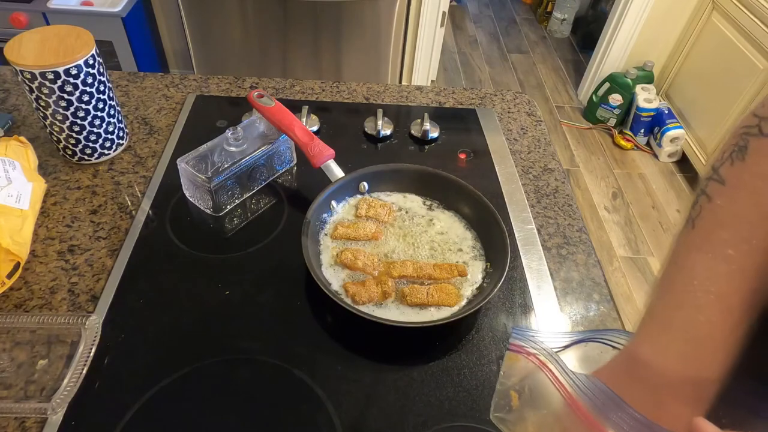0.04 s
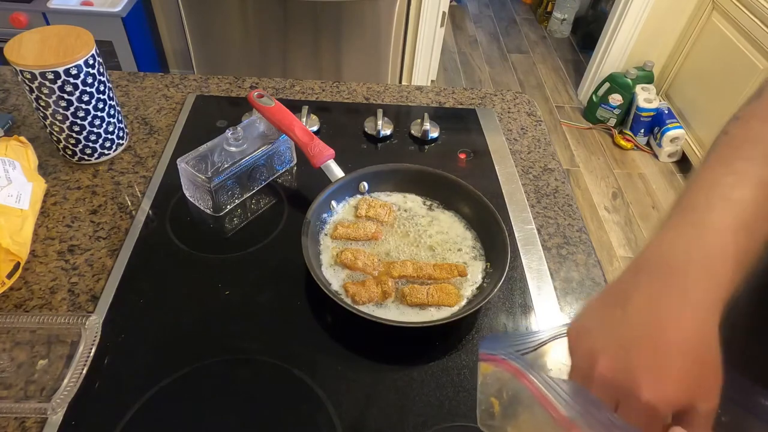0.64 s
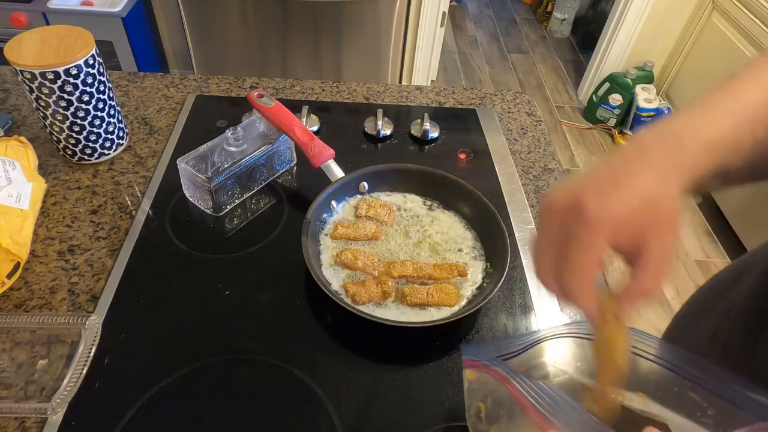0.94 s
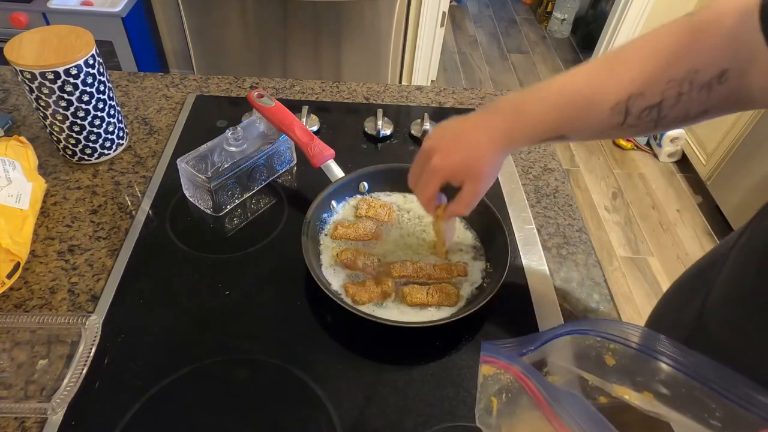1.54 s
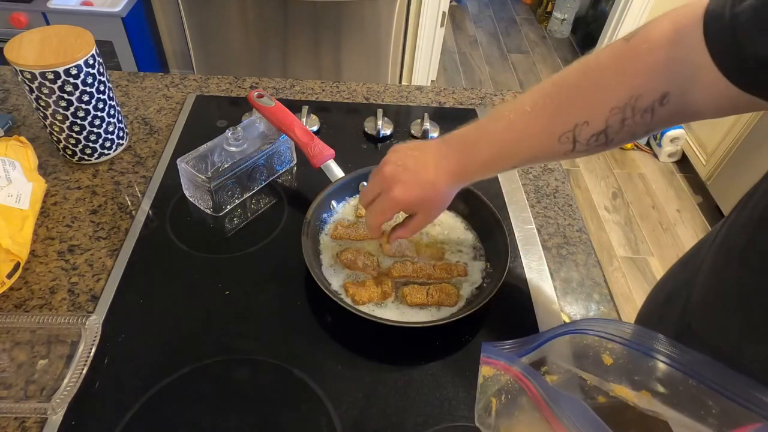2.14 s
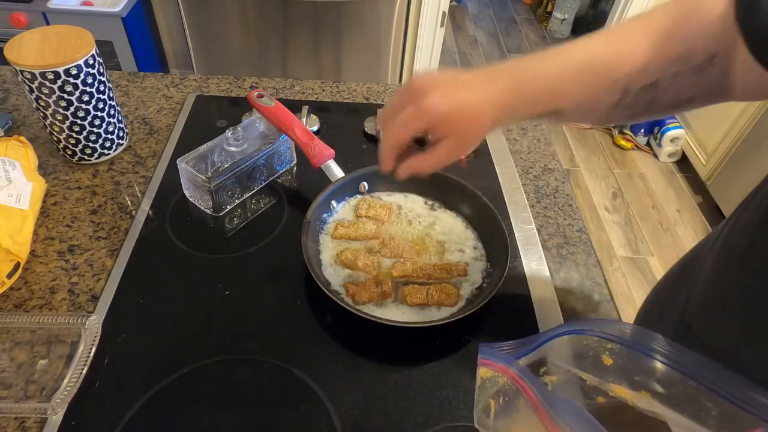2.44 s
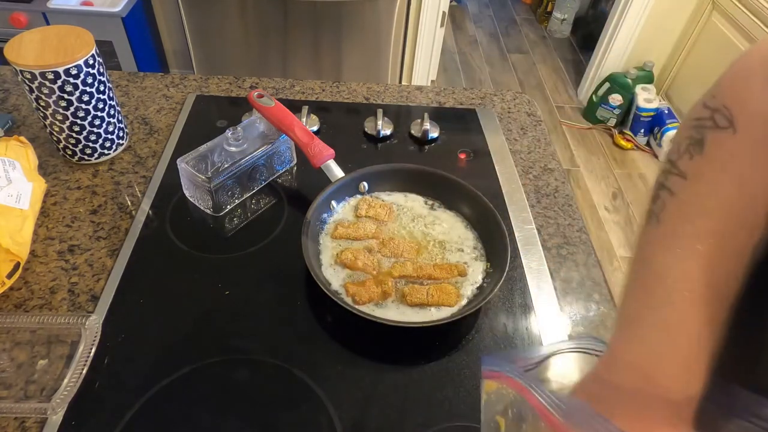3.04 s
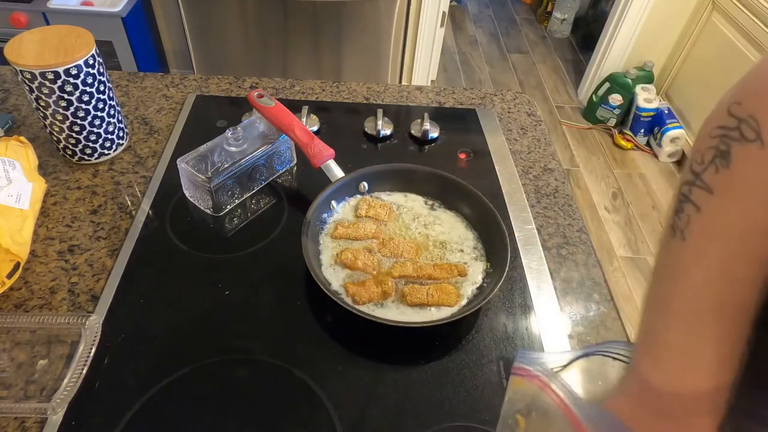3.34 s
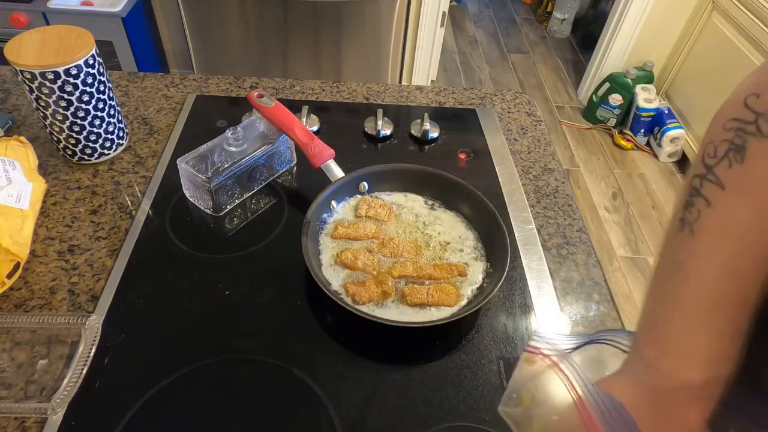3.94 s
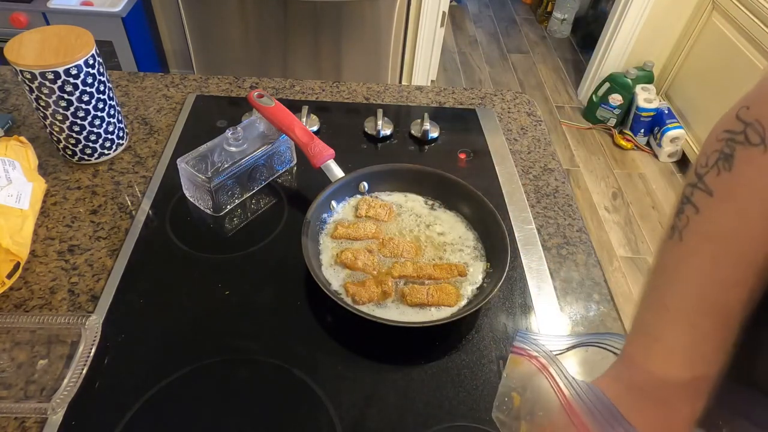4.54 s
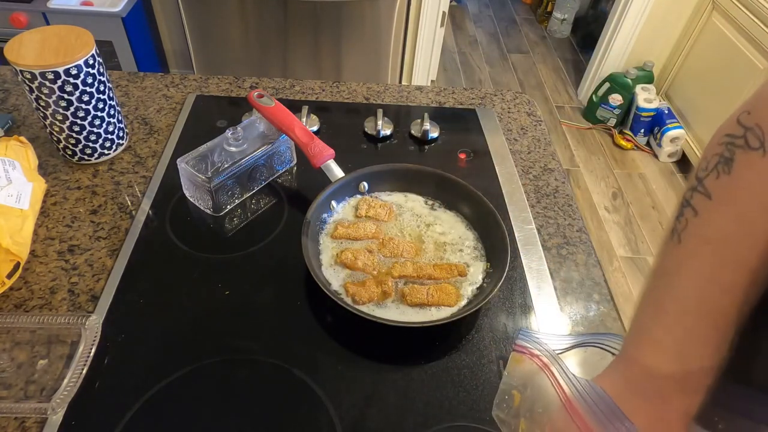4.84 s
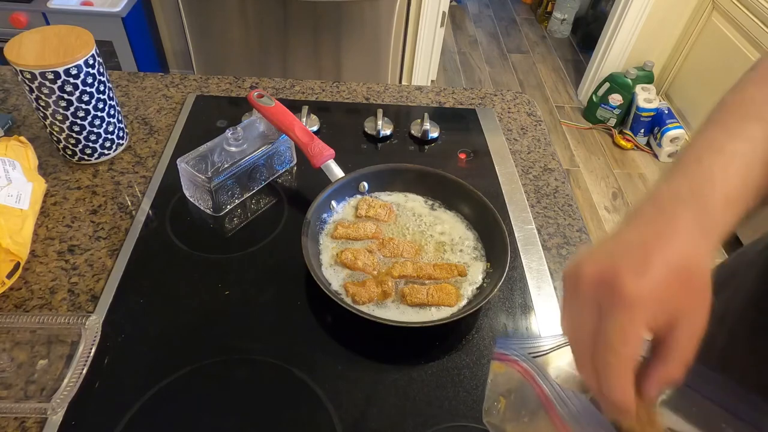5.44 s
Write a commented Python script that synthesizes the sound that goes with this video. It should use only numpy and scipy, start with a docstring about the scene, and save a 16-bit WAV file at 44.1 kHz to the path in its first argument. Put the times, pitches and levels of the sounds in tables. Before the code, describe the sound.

Food fries with a crackling hiss and sharp little pops, and midway a plastic bag rustles and snaps beside the pan.

```python
"""Breaded food fries in butter in a small kitchen, heard at two close microphone ports over a low hum.
From the start, steam bubbles burst in the fat: thousands sum to a sizzle, and larger ones pop singly.
Near 1 s a crease snaps in a plastic bag beside the pan. From 2.9 to 4.3 s a hand rummages in the bag,
whose film buckles in rustles and snaps, and the bag bumps the counter. At 5.3 s the hand stirs it
once more, and the frying carries on to the end."""
import sys
import numpy as np
from scipy import signal
from scipy.fft import rfft, irfft
from scipy.io import wavfile
from scipy.ndimage import uniform_filter1d

SR = 44100
rng = np.random.default_rng(int(sys.argv[2]) if len(sys.argv) > 2 else 0)


def master(y):
    """Save y as 16-bit WAV."""
    cut = np.clip(np.atleast_2d(y).T, -1, 1)
    pcm = np.round(cut * 32767)  # scale
    wavfile.write(sys.argv[1], SR, pcm.astype(np.int16))


N = 251811
TIME = np.arange(N) / SR


def amp(db):
    """Amplitude grows tenfold every 20 decibels."""
    return 10 ** (np.asarray(db) / 20)


def unit(x):
    """Normalisation to an rms of 1."""
    return x / np.sqrt(np.mean(x ** 2) + 1e-20)


def read(points, hz):
    """Interpolation on a logarithmic frequency axis."""
    f, value = np.transpose(points)
    return np.interp(np.log(hz + 1), np.log(f + 1), value)


def level(rows):
    """An envelope interpolated through rows of time_s, level_db."""
    s, db = np.transpose(rows)
    return amp(np.interp(TIME, s, db))


def swells(rows):
    """An envelope of summed Gaussian bells."""
    return sum(amp(db) * np.exp(-.5 * ((TIME - s) / width) ** 2) for s, width, db in rows)


def flutter(size):
    """A moving average over size samples turns white noise into a slow fluctuation."""
    return unit(uniform_filter1d(rng.standard_normal(N), size))


def add(mix, s, sound):
    """Superposition of a sound starting at time s."""
    part = mix[max(round(s * SR), 0):][:len(sound)]
    part += sound[:len(part)]


def colour(x, points, size=4096):
    """Minimum-phase filtering shapes the spectrum while clicks keep their sharp front."""
    log_gain = np.log(amp(read(points, abs(np.fft.fftfreq(size, 1 / SR)))))
    taps = np.fft.ifft(np.exp(np.conj(signal.hilbert(log_gain)))).real[:size // 2]
    return signal.fftconvolve(x, taps)[:len(x)]


def noise(spectrum):
    """Filtered white noise of rms 1."""
    return unit(colour(rng.standard_normal(N), spectrum))


def high_pass(x, hz):
    """Second-order roll-off below hz."""
    return signal.sosfilt(signal.butter(N=2, Wn=hz, btype="high", fs=SR, output="sos"), x)


def ping(hz, cycles, size=900):
    """A heavily damped oscillation whose envelope peaks at 1 after the given cycles."""
    turns = hz * np.arange(size) / SR
    return turns / cycles * np.exp(1 - turns / cycles) * np.sin(2 * np.pi * turns)


def crack(decay_s, low_hz, size=900):
    """A broadband transient: bright noise under an exponential decay."""
    return high_pass(rng.standard_normal(size) * np.exp(-TIME[:size] / decay_s), low_hz)


def ricochet(strength, decay_s, size=400):
    """Scattering trails an impulse with a few milliseconds of random echoes."""
    echoes = strength * rng.standard_normal(size) * (rng.random(size) < 3000 / SR)
    return np.r_[1, echoes * np.exp(-TIME[:size] / decay_s)]


def grains(low_hz, high_hz, per_s, spread_db, cycles, scatter_s, scatter, crowding, count=22):
    """Shot noise: random pings, many high and few low, sum to an even spectrum."""
    pitches, out = np.geomspace(low_hz, high_hz, count), np.zeros(N)
    shares = pitches ** crowding / np.sum(pitches ** crowding)
    for hz, share in zip(pitches, shares):
        grain = np.convolve(ping(hz, cycles), ricochet(scatter, scatter_s))
        onsets = rng.random(N) < per_s * share / SR
        strength = np.minimum(rng.exponential(1, N), 3.4)
        train = onsets * amp(spread_db * strength)
        out += np.sqrt(hz) * unit(signal.oaconvolve(train, grain)[:N])
    return unit(high_pass(out, low_hz / 2))


# Spectrum of the room noise: frequency_hz, gain_db
FLOOR_SPECTRUM = [(20, 1.5), (48, -1), (80, -4.5), (125, 2), (165, 4), (230, -1.5), (330, -5.5),
                  (450, -8.5), (700, -18.5), (1500, -6.5), (8000, -56)]
# Appliance tones: pitch_hz, level_db
HUM_TONES = [(120, -72.5), (151.5, -70)]
def background(floor_db=-59, side_db=-12, waver=1.0):
    """Appliances hum with slow amplitude and phase modulation over low room noise."""
    mid, side = noise(FLOOR_SPECTRUM), noise(FLOOR_SPECTRUM)
    hum = np.zeros(N)
    for hz, db in HUM_TONES:
        drift = flutter(9000)
        hum += amp(db) * np.sqrt(2) * (1 + waver * drift) * np.sin(2 * np.pi * hz * TIME + drift)
    return hum + amp(floor_db) * (mid + amp(side_db) * np.array([side, -side]))


# Time for the reverberation to fall 60 dB: frequency_hz, decay_s
REVERB_TIMES = [(150, 0.59), (1000, 0.48), (4000, 0.13), (8000, 0.21), (13000, 0.11)]
# Spectrum of the reverberation: frequency_hz, gain_db
REVERB_SPECTRUM = [(100, -3), (1000, 0), (4000, -1), (8000, -7), (13000, -15)]
# Its side signal relative to its mid: frequency_hz, gain_db
REVERB_WIDTH = [(100, -3.5), (1000, -7), (3000, -5.5), (6000, 9), (12000, 18)]
def kitchen(x, wet_db, gap_s=0.0016, size=16000):
    """Reverberation: a diffuse tail, weaker, shorter and wider in the treble, follows the direct sound."""
    taps = rng.standard_normal((2, size)) * (rng.random((2, size)) < 3000 / SR) * (TIME[:size] > gap_s)
    hz, t, bands = signal.stft(taps, SR, nperseg=256)
    bands *= amp(-60 * t / read(REVERB_TIMES, hz)[:, None])
    bands *= amp(read(REVERB_SPECTRUM, hz))[:, None]
    bands[1] *= amp(read(REVERB_WIDTH, hz))[:, None]  # long waves reach both ports alike
    mid, side = signal.istft(bands, SR)[1]
    response = amp(wet_db) * np.array([mid + side, mid - side]) / np.linalg.norm(mid)
    response[:, 0] += 1  # direct path
    return signal.fftconvolve(np.atleast_2d(x), response, axes=1)[:, :N]


# Impacts on the counter: start_s, level_db, pitch_hz, decay_s
COUNTER_BUMPS = [(3.611, -44.5, 52.7, 0.015), (5.29, -54, 45, 0.012)]
def bumps():
    """Soft impact: the bag's contents drop on the counter and excite a low, damped vibration."""
    out = np.zeros(N)
    for s, db, hz, decay_s in COUNTER_BUMPS:
        add(out, s, amp(db) * ping(hz, hz * decay_s, size=8000))
    return out


# Shifts of the bag: centre_s, half_width_s, level_db
BAG_SHIFTS = [(3.0, 0.059, -53.5), (3.28, 0.041, -55), (3.63, 0.024, -55.5)]
def heaves():
    """Friction with the counter makes a low rub as the whole bag shifts."""
    return swells(BAG_SHIFTS) * noise([(40, -2), (80, -1.5), (180, 7), (260, -8), (600, -48)])


# Strokes of the hand: centre_s, half_width_s, level_db
HAND_SLIDES = [(2.91, 0.037, -49.5), (3.31, 0.02, -52), (5.305, 0.05, -47.5)]
# Spectrum of the sliding: frequency_hz, gain_db
SLIDE_SPECTRUM = [(300, -25), (1200, -9), (2900, 13.5), (5000, -3), (8000, -16), (10000, -13), (15000, -28)]
def slides(grain_db=3):
    """Stick-slip friction: the hand catches along the film with a fine, airy crunch."""
    catches = amp(grain_db * flutter(90))
    return swells(HAND_SLIDES) * unit(colour(catches * rng.standard_normal(N), SLIDE_SPECTRUM))


# The hand closing on the bag: start_s, hold_s, level_db
HAND_GRIPS = [(2.87, 0.045, -47.5), (2.98, 0.0065, -41.5), (3.02, 0.011, -39), (3.236, 0.04, -43),
              (3.298, 0.025, -44), (3.418, 0.042, -36), (3.597, 0.024, -34.5), (3.72, 0.071, -49.5),
              (4.076, 0.02, -44.5), (4.123, 0.039, -40), (4.172, 0.008, -43.5), (4.208, 0.0062, -34),
              (4.29, 0.021, -51.5), (5.26, 0.13, -51)]
# The hand feeling about between grips: start_s, hold_s, level_db
HAND_SEARCH = [(2.884, 1.42, -58)]
def hand_effort(rise_share=0.12, release_s=0.01):
    """Incoherent sources add in power: each gesture builds, holds and dies as the film relaxes."""
    power = np.zeros(N)
    for start, hold, db in HAND_GRIPS + HAND_SEARCH:
        rise = np.clip((TIME - start) / (rise_share * hold), 0, 1)
        fall = np.exp(-np.maximum(TIME - start - hold, 0) / release_s)
        power += (amp(db) * rise * fall) ** 2
    return np.sqrt(power)


# Spectrum of the crumpling film: frequency_hz, gain_db
CRUMPLE_SPECTRUM = [(60, 5), (200, -10), (420, 4.5), (800, 3.5), (1350, 8.5), (2100, 4), (3300, 4.5),
                    (6000, -10.5), (9000, -34), (15000, -57)]
# Spectrum of skin brushing the film: frequency_hz, gain_db
SWISH_SPECTRUM = [(500, 17), (2000, -13), (5000, 11), (9000, 1), (12000, -8), (15000, -25)]
def rustle(flurry_db=3.5, swish_db=-43.5, swish_growth=0.28):
    """Small creases buckle in flurries under the hand, and friction with the skin adds a swish."""
    effort = hand_effort()
    flurries = unit(amp(flurry_db * flutter(130)))
    creases = grains(low_hz=245, high_hz=11600, per_s=5700, spread_db=1.0, cycles=0.48,
                     scatter_s=0.0013, scatter=0.77, crowding=0.8)
    crumple = effort * unit(colour(flurries * creases, CRUMPLE_SPECTRUM))
    swish = amp(swish_db) * effort ** swish_growth * flurries * noise(SWISH_SPECTRUM)
    return crumple + swish


# Creases snapping over: start_s, level_db, pitch_hz, click_db, spray_db, flap_db
# The last three are offsets from level_db.
CREASE_SNAPS = [(0.9526, -36.5, 1090, 19.5, -7.5, -3.5), (3.013, -44, 1500, 5, -12, -15),
                (3.0229, -25, 1290, 4, -12, -1.5), (3.064, -48, 1500, 8, -12, -15),
                (3.158, -19, 1475, -2, -25.5, -12.5), (3.205, -35, 1630, -2, -18, -11),
                (3.2401, -24, 1140, 10, -27, -18), (3.2629, -25, 1230, -8, -35, -29),
                (3.4338, -22.5, 1550, 12.7, -18, -23), (3.5036, -30.5, 1480, 1, -14.5, -4),
                (3.573, -30, 1760, -2, -19, -1.5), (3.5883, -29.5, 1610, -2, -16, -8),
                (3.6175, -32.5, 1510, -2, -34, -2), (3.622, -39, 1200, -8, -28, 3.5),
                (3.6412, -40, 1530, 10, -26, -10), (3.7781, -34, 1080, 13, -12, -0.5),
                (4.0364, -42, 1440, 18, -2.5, 2), (4.0817, -45, 1430, 7, -1.5, -18),
                (4.087, -37, 1420, -4, -5.5, -22), (4.093, -37, 1430, 12, -13, -10),
                (4.1262, -41.5, 1490, 0, -9, -2), (4.1326, -31.5, 1500, 1, -15, -2),
                (4.142, -33, 1400, -4, -15, -6), (4.157, -36.5, 1780, 2, -21, 4),
                (4.183, -35, 1700, 2, -19, -5), (4.2073, -27.5, 1410, 4, -13.5, 3),
                (4.213, -35, 1670, 15, -4, -3), (4.2739, -27.5, 1380, 6.5, -16.5, -9),
                (4.3007, -43, 1400, 17, -18, -10)]
def snaps(snaps_db=-2, flap_boost_db=7, spray_boost_db=6, settle_db=-25.5, flap_hz=310, click_hz=3100):
    """Snap-through buckling: a crease clicks, the taut film rings, the sheet flaps and settles."""
    ports, clicks = np.zeros((2, N)), np.zeros(N)
    for s, db, hz, click_db, spray_db, flap_db in CREASE_SNAPS:
        flap = amp(flap_db + flap_boost_db) * ping(flap_hz * rng.uniform(.8, 1.25), cycles=.25)
        body = ping(hz, cycles=0.73) + flap
        click = np.convolve(ping(click_hz, cycles=0.4), ricochet(0.22, 0.0016))
        add(clicks, s, amp(db + click_db) * click)
        spray_gain = amp(db + spray_db + spray_boost_db)
        for port in ports:  # each port gets its own bright noise
            add(port, s, amp(db) * body + spray_gain * crack(decay_s=0.0017, low_hz=3170))
            add(port, s, spray_gain * amp(settle_db) * crack(decay_s=0.011, low_hz=4000, size=2500))
    film = [(60, -13.5), (250, -10.5), (1400, 3.5), (2000, 4.5), (3000, 25.5), (6000, 13.5),
            (9000, 4.5), (12000, -5.0), (15000, -19)]
    return high_pass(clicks, hz=414) + amp(snaps_db) * np.array([colour(port, film) for port in ports])


# Resonances heard in the rustle, the bag's low and middle modes and a thin ring near 8.7 kHz,
# probably of the microphone port: pitch_hz, bandwidth_hz, gain_db
RUSTLE_RESONANCES = [(455, 32, -4.5), (502, 50, -6.5), (574, 27, -7), (721, 38, 0), (1220, 41, -25),
                     (1397, 59, -4), (1545, 55, -26), (1750, 110, -14), (8680, 130, 0)]
def resonances(x, dry_db=-1.0, ring_db=-3, right_lead_db=6):
    """Resonance: each crease briefly excites the bag and a thin high ring, louder on the right."""
    ring = sum(amp(db) * signal.lfilter(*signal.iirpeak(hz, hz / width, fs=SR), x)
               for hz, width, db in RUSTLE_RESONANCES)
    return amp(dry_db) * x + amp(ring_db) * ring * amp([[-right_lead_db / 2], [right_lead_db / 2]])


# How much the butter foams: time_s, level_db
FOAM_LEVELS = [(0.0, -48), (0.7, -44.5), (1.5, -46.5), (2.25, -45.5), (2.42, -67), (2.8, -48), (3.4, -47),
               (5.3, -54), (5.7, -49)]
def foam(foam_db=-5.5, surge_db=3.6):
    """Damped bubble resonance: the foaming butter bursts in short surges, a wet crackle."""
    bubbles = grains(low_hz=1100, high_hz=4500, per_s=1100, spread_db=4.5, cycles=1.2,
                     scatter_s=0.0011, scatter=0.1, crowding=0.9, count=36)
    surges = amp(surge_db * flutter(700))
    spectrum = [(600, -21.5), (1050, -2), (1500, -1.0), (1900, 0), (3000, 0), (4500, -8)]
    return amp(foam_db) * level(FOAM_LEVELS) * unit(colour(surges * bubbles, spectrum))


# How hard the butter boils, for steam and sizzle alike: time_s, level_db
BOIL_LEVELS = [(0.0, -47), (0.67, -46), (2.62, -47), (3.02, -46.5), (5.36, -47.5), (5.7, -48)]
# Spectrum of the steam: frequency_hz, gain_db
STEAM_SPECTRUM = [(800, -9), (2000, -1), (3500, 3.5), (6300, -5), (8000, -16.5), (8800, -12.5),
                  (12000, -26), (15000, -39)]
def steam(steam_db=-10.5):
    """An extended source: hiss from the whole pan arrives uncorrelated at the two ports."""
    return amp(steam_db) * level(BOIL_LEVELS) * np.array([noise(STEAM_SPECTRUM) for _ in range(2)])


# Spectrum of the tiny bursts: frequency_hz, gain_db
SIZZLE_SPECTRUM = [(290, -80), (500, -2), (655, -24), (1080, -7.5), (1260, -13.5), (1700, -11.5),
                   (1800, -5), (2880, -0.5), (3670, -3), (5620, -14), (6300, -15.5), (7910, -29),
                   (11900, -52.5), (15000, -64)]
def sizzle(sizzle_db=0.57, clump_db=3.5):
    """Superposition: thousands of tiny bubbles a second burst in the fat, in brief clumps."""
    bubbles = grains(low_hz=1036, high_hz=11320, per_s=12000, spread_db=6.5, cycles=0.61,
                     scatter_s=0.0035, scatter=0.12, crowding=0.98)
    clumps = amp(clump_db * flutter(260))
    return amp(sizzle_db) * level(BOIL_LEVELS) * unit(colour(clumps * bubbles, SIZZLE_SPECTRUM))


# The clearest droplets of fat: start_s, level_db, pitch_hz
DROPLETS = [(0.0595, -33, 5000), (0.2438, -35, 4900), (0.5102, -29, 4800), (1.4371, -43, 8600),
            (1.814, -37, 5350), (2.2558, -33, 6350), (2.3221, -30, 5840), (2.5646, -35, 4670),
            (2.6813, -31, 4860), (4.362, -32, 4970), (4.6139, -35, 4790), (4.9043, -30, 5560),
            (5.1542, -33, 5360), (5.6880, -32, 4970)]
def spatters(per_s=18, tick_db=-46, spread_db=4, tick_hz=6160, spread_octaves=0.27):
    """Impulsive excitation: droplets flick off with bright ticks, a few clear, the rest at random."""
    out, rows = np.zeros(N), list(DROPLETS)
    for s in TIME[rng.random(N) < per_s / SR]:
        big, high = rng.standard_normal(2)
        rows.append((s, tick_db + spread_db * big, tick_hz * 2 ** (spread_octaves * high)))
    for s, db, hz in rows:
        add(out, s, amp(db) * np.convolve(ping(hz, cycles=1.0), ricochet(0.23, 0.0015)))
    return high_pass(out, hz=2500)


def pop(db, hz, plop_db, plop_hz=1150, tear_db=-28):
    """Cavity resonance: a bubble tears open with a crack and rings; the fat closes with a plop."""
    plop = amp(plop_db) * ping(plop_hz * 2 ** rng.uniform(-.25, .25), cycles=.55)
    ring = high_pass(ping(hz, cycles=0.66), hz / 2)
    tear = amp(tear_db) * crack(decay_s=0.0019, low_hz=1590)
    return amp(db) * np.convolve(ring + plop + tear, ricochet(0.25, 0.0016))


# The largest bubbles bursting: start_s, level_db, pitch_hz, relative_plop_db
LARGE_BUBBLES = [(0.068, -18, 2570, -35), (0.2433, -28.5, 2850, -26), (0.3068, -31.5, 2850, -24),
                 (0.3497, -28.5, 3350, -24), (0.411, -43, 3680, -29), (0.4398, -27.5, 3400, -36),
                 (0.5097, -26, 2340, -26), (0.512, -33, 2400, -26), (0.5902, -31, 2980, -1.5),
                 (0.6454, -37, 2130, -12), (0.662, -36.5, 2090, -6), (0.753, -31, 3630, -16),
                 (0.9293, -28, 3050, -21), (1.058, -34, 2540, -27), (1.078, -31, 2910, -26),
                 (1.088, -32.5, 2860, -11.5), (1.117, -32, 3500, -21), (1.294, -29, 2640, -16),
                 (1.3416, -33, 2920, -16), (1.3587, -31.5, 3340, -14), (1.4527, -32, 3100, -13),
                 (1.48, -29, 2620, -9), (1.57, -32.5, 2180, -11), (1.654, -32.5, 2040, -15),
                 (1.685, -37, 3080, -22), (1.819, -27.5, 3570, -16), (1.9002, -29, 3330, -30),
                 (2.0541, -27.5, 2530, -16.5), (2.2102, -28, 2860, -17), (2.548, -31, 2800, -29),
                 (2.7281, -31.5, 2800, -26), (2.97, -38, 2400, -13), (3.0717, -32, 2400, -13),
                 (3.3532, -26, 2720, -13), (3.559, -31, 2760, -5), (3.7376, -36, 2740, -16),
                 (3.8444, -31, 2670, -26), (3.8593, -22, 3070, -20), (4.3894, -33, 2500, -23),
                 (4.586, -36.5, 2980, -3.5), (5.1193, -37.5, 2550, -23), (5.1538, -27.5, 3020, -17.5),
                 (5.298, -28, 2520, -8.5), (5.3951, -31.5, 2720, -18), (5.4255, -32, 2740, -17),
                 (5.4444, -32, 2430, -15)]
def pops(pops_db=-1, spits_per_s=26, spit_db=-40.5, spread_db=2, spit_hz=2900, spread_octaves=0.27):
    """Source and filter: large pops and lesser random spits are coloured by the pan."""
    out = np.zeros(N)
    for s, db, hz, plop_db in LARGE_BUBBLES:
        add(out, s, pop(db, hz, plop_db))
    for s in TIME[rng.random(N) < spits_per_s / SR]:
        big, high = rng.standard_normal(2)
        add(out, s, pop(spit_db + spread_db * big, spit_hz * 2 ** (spread_octaves * high), plop_db=-17))
    pan = [(300, -57.0), (750, -2.0), (1100, 9.5), (2500, 6.5), (5000, 7.5), (9000, 1), (15000, -45)]
    return amp(pops_db) * colour(out, pan)


def pan_echoes(x, wet_db, turns_per_s=47, count=4):
    """Echoes depend on source position: the bursts cycle through places in the pan, each with its own."""
    place = (TIME * turns_per_s % 1) * count
    echoes = np.zeros((2, N))
    for k in range(count):
        distance = abs((place - k + count / 2) % count - count / 2)
        share = x * np.cos(np.pi / 2 * np.minimum(distance, 1))
        echoes += kitchen(share, wet_db) - share
    return x + echoes


def scene(frying_db=-2.0):
    """The direct-to-reverberant ratio sets distance: the bag is drier, so nearer, than the pan."""
    frying = amp(frying_db) * pan_echoes(sizzle() + foam() + pops() + spatters(), wet_db=-12.5)
    plastic = resonances(rustle() + snaps()) + slides() + heaves() + bumps()
    bag = kitchen(plastic, wet_db=-17.0)
    return frying + steam() + bag + background()


# Left port relative to right: frequency_hz, gain_db
PORT_BALANCE = [(60, 0.5), (400, -1.8), (1300, -1.3), (2400, 0.7), (5400, -1.5), (7100, 0.8), (8300, -5),
                (10400, -3.5), (12000, -7.5), (15000, -5)]
def record(dry, lag_s=4e-5, cutoff_hz=15500):
    """Time and level cues: the right port hears earlier and brighter; both are band-limited."""
    hz = np.fft.rfftfreq(2 * N, 1 / SR)
    tilt = amp(read(PORT_BALANCE, hz) / 2)
    delay = np.exp(-2j * np.pi * hz * lag_s)
    ports = irfft(rfft(dry, 2 * N) * np.array([tilt * delay, 1 / tilt]))[:, :N]
    low_pass = signal.firwin(511, cutoff_hz, window=("kaiser", 9), fs=SR)
    return signal.oaconvolve(ports, low_pass[None], "same")


dry = scene()
out = record(dry)
master(out)
```